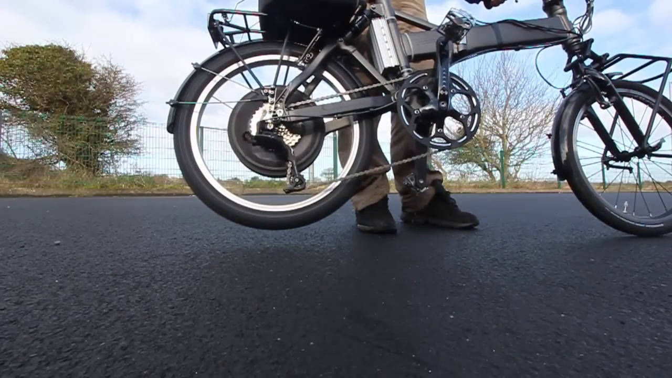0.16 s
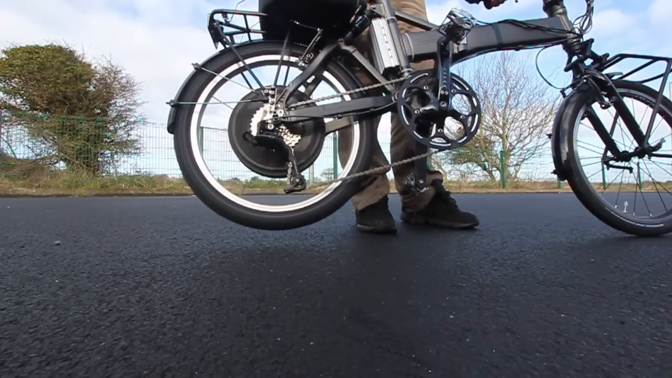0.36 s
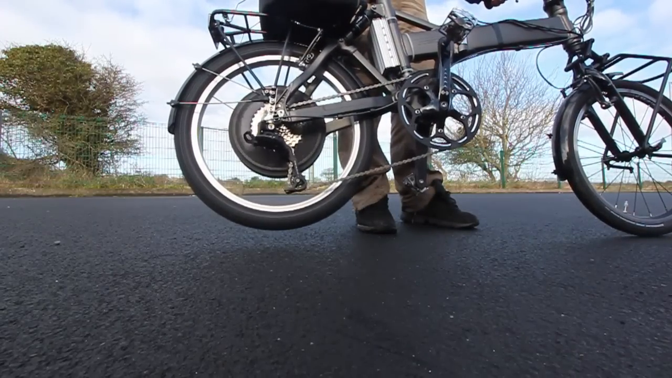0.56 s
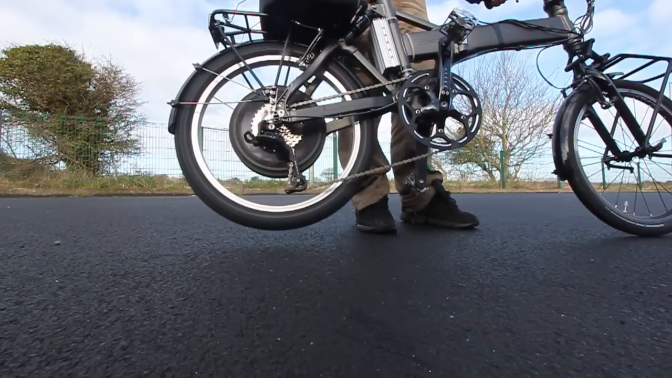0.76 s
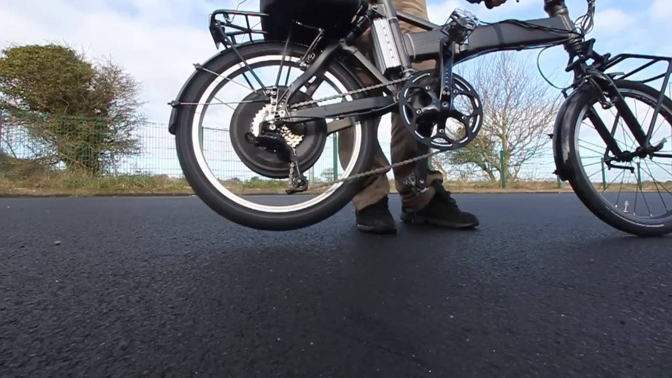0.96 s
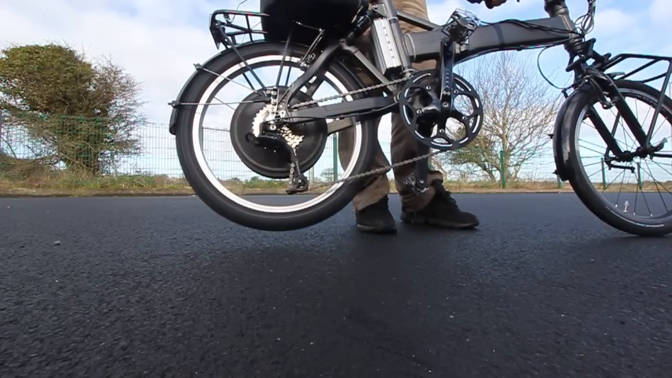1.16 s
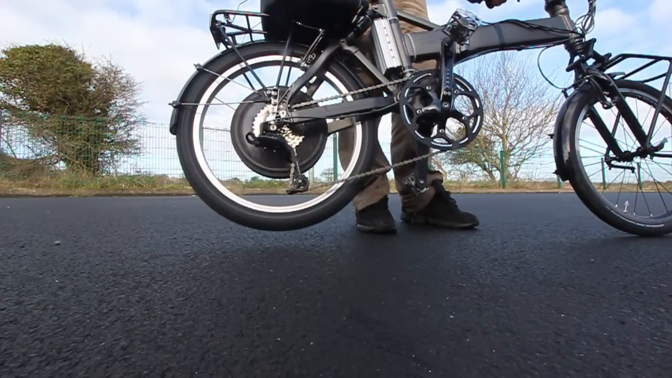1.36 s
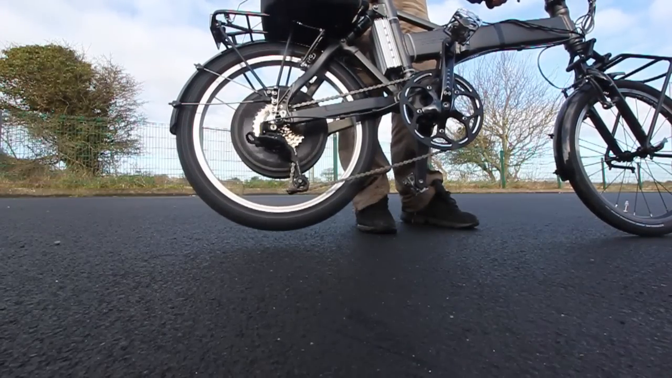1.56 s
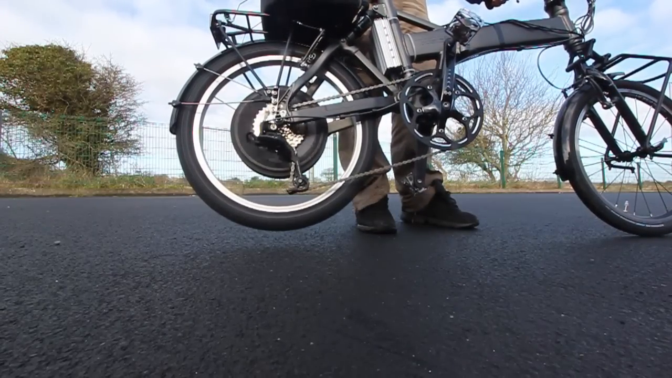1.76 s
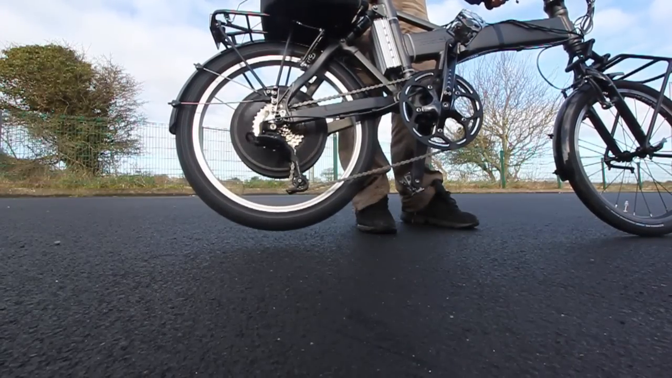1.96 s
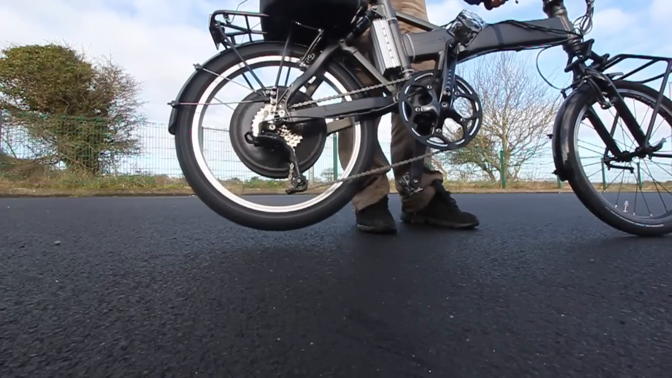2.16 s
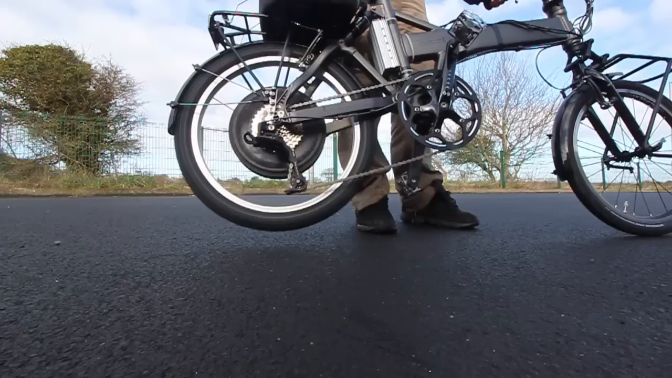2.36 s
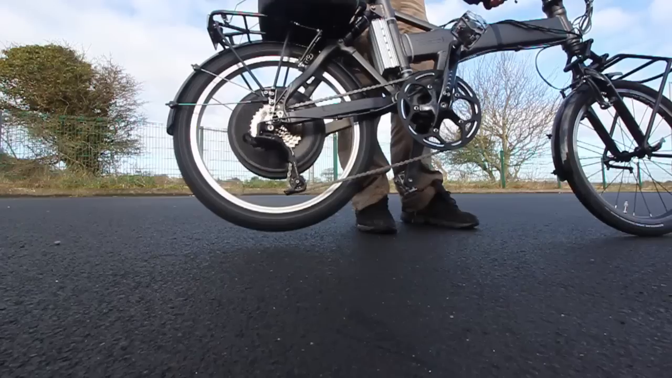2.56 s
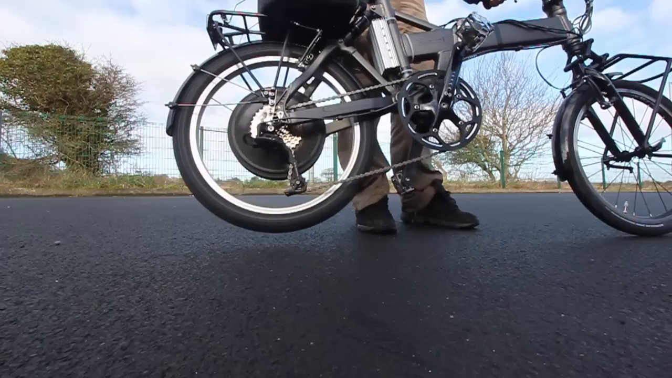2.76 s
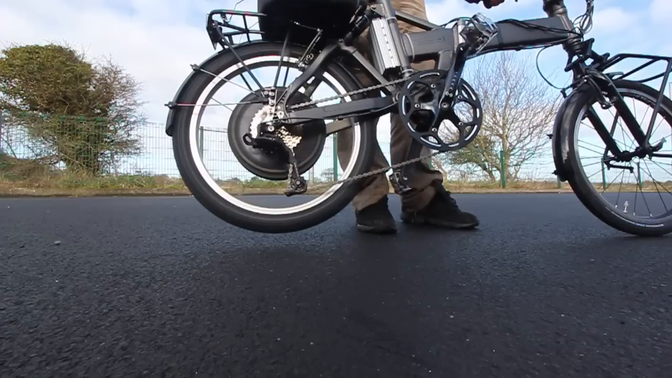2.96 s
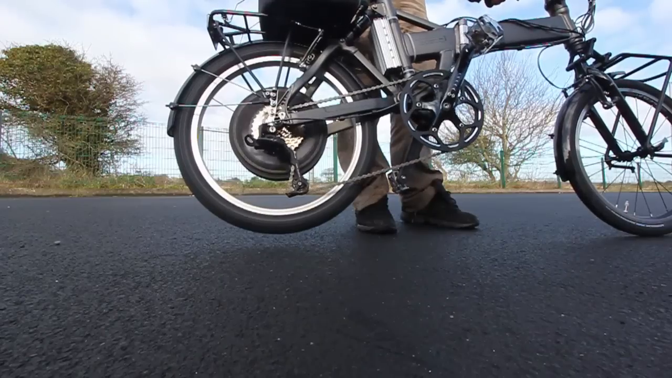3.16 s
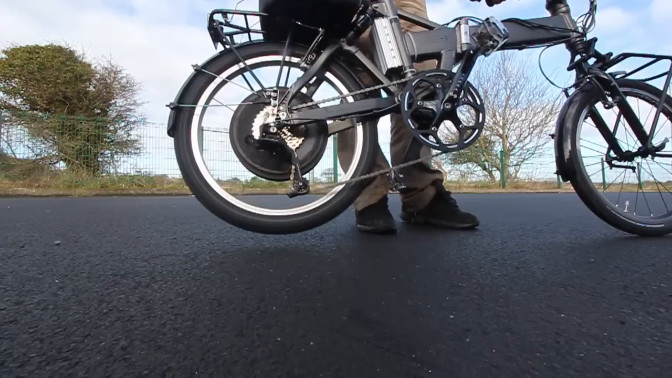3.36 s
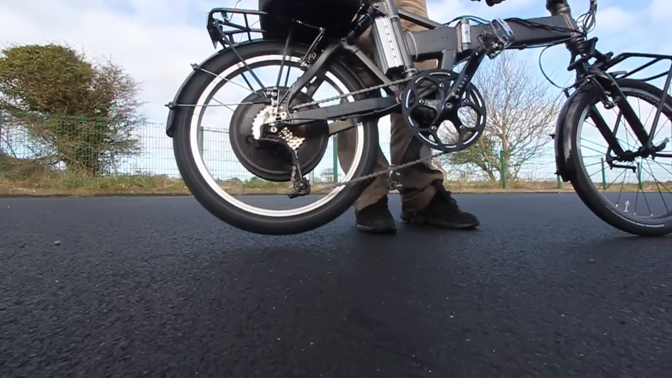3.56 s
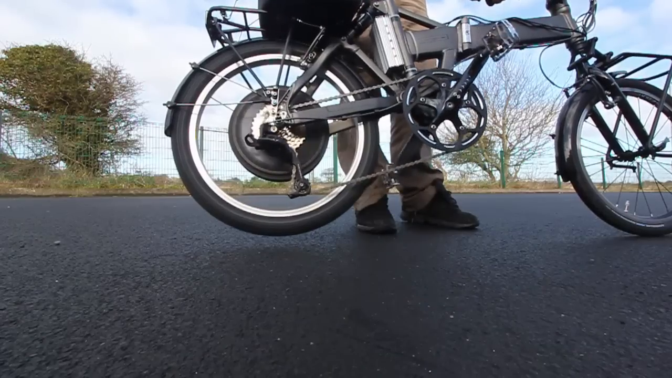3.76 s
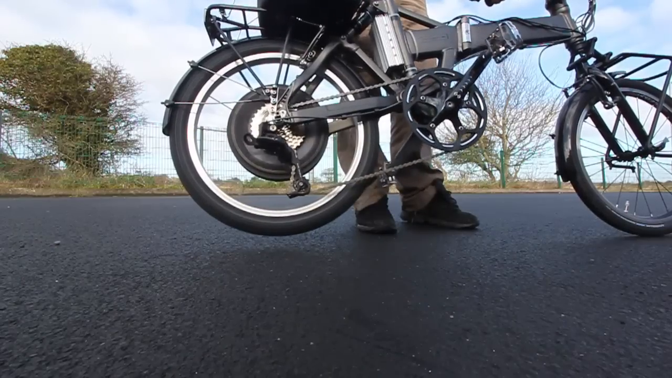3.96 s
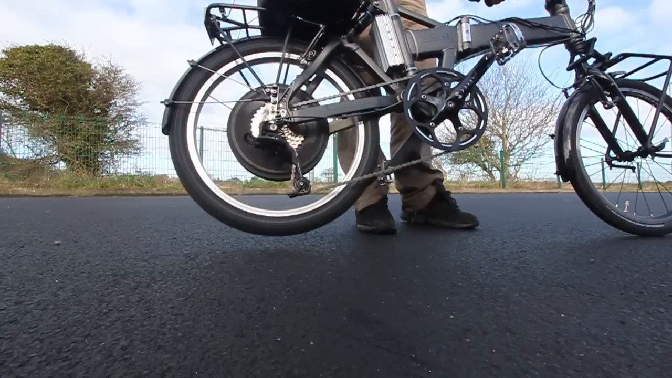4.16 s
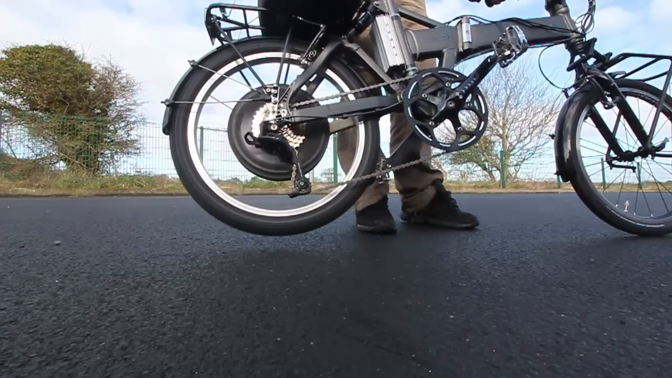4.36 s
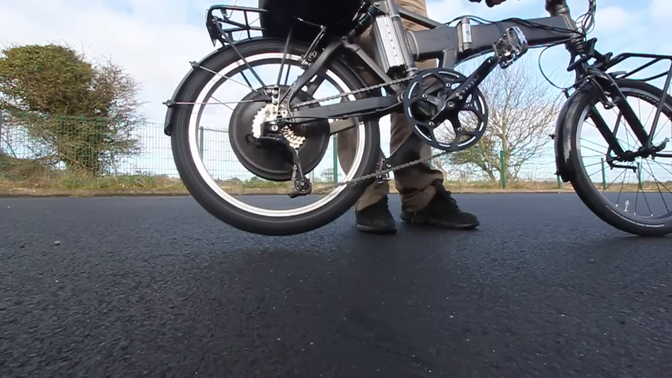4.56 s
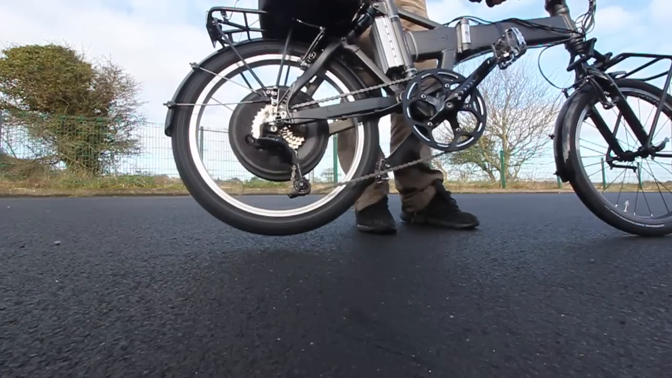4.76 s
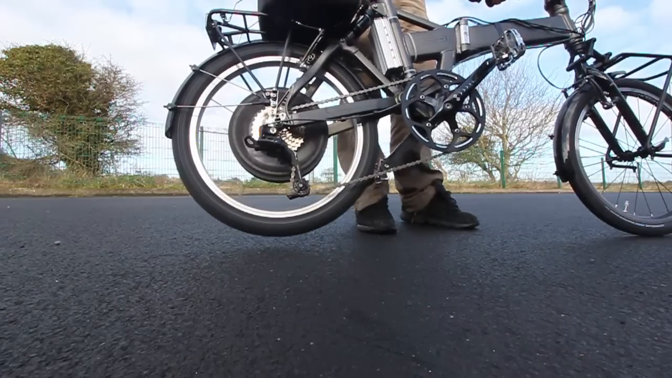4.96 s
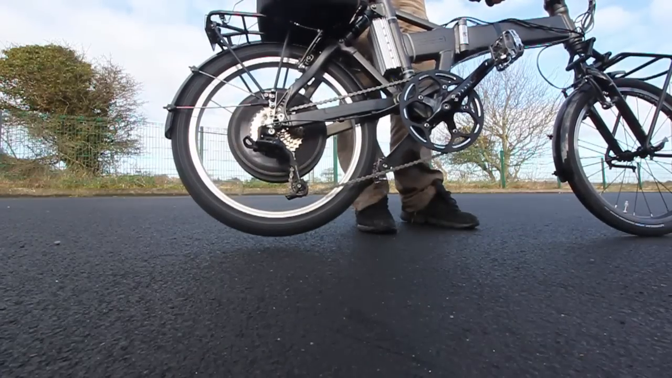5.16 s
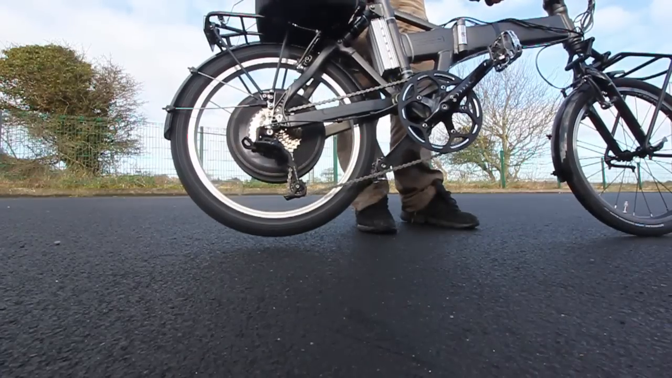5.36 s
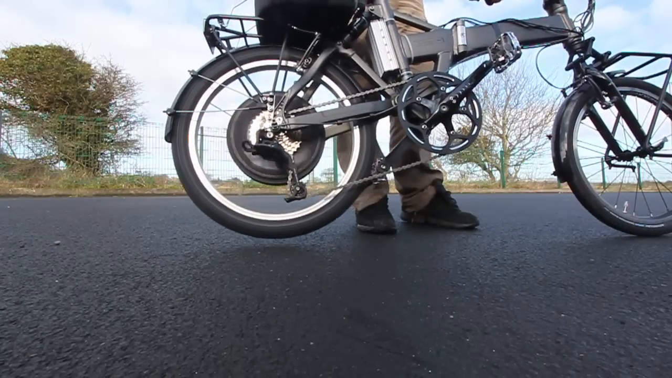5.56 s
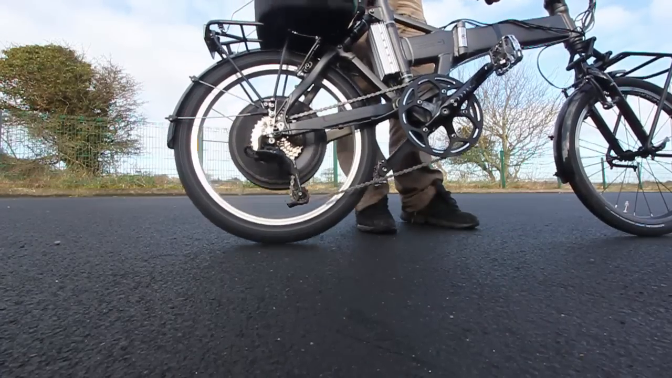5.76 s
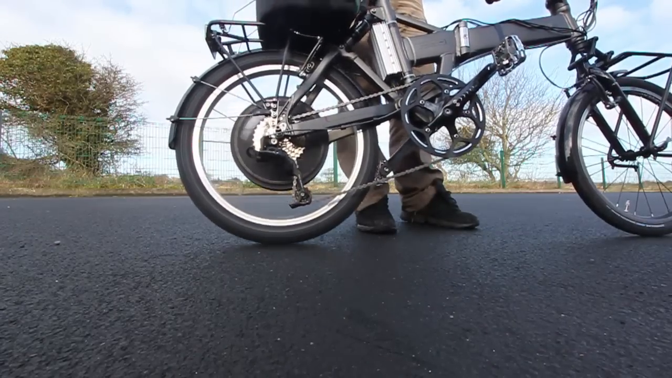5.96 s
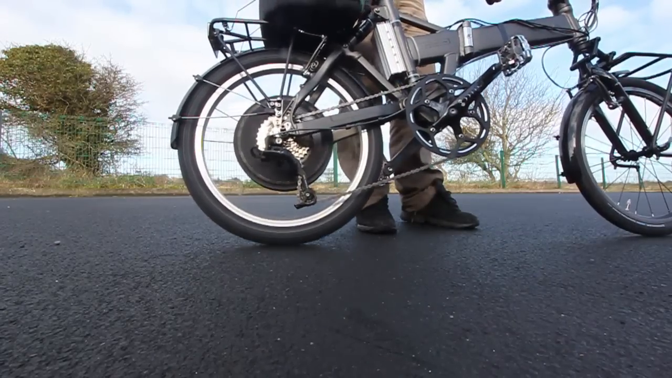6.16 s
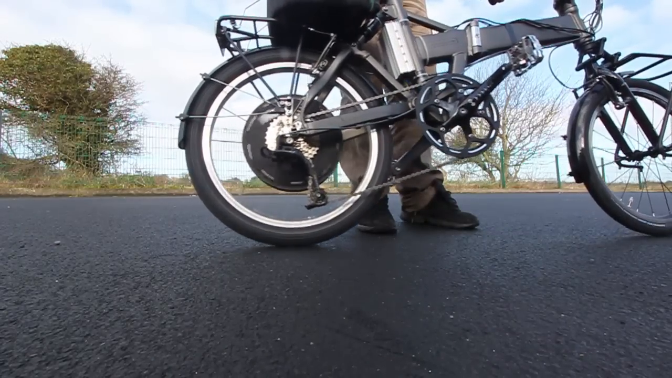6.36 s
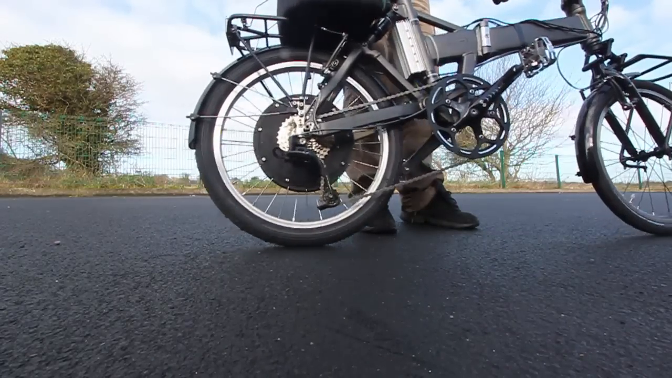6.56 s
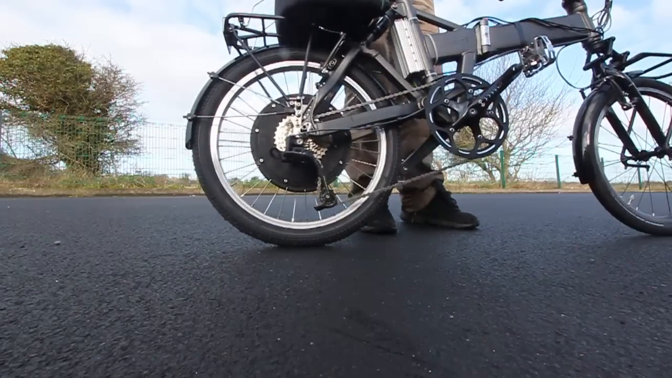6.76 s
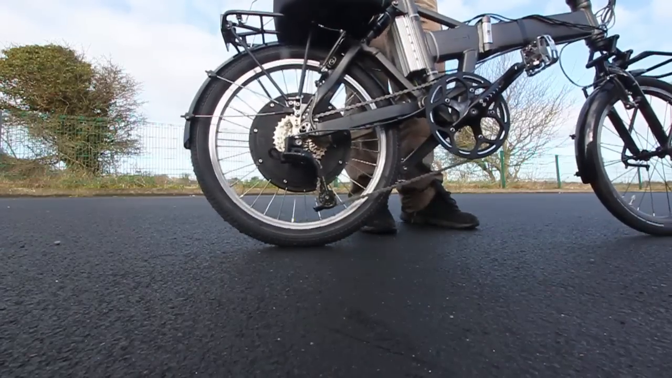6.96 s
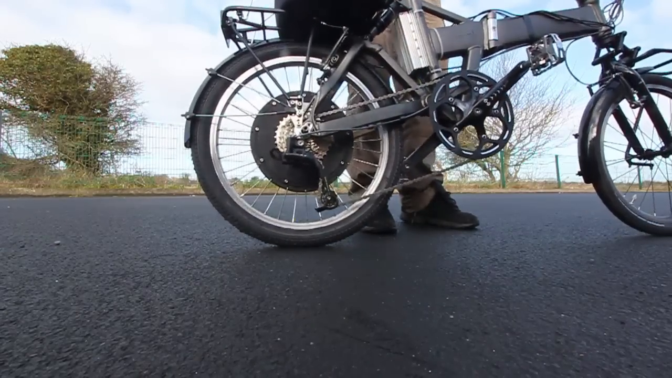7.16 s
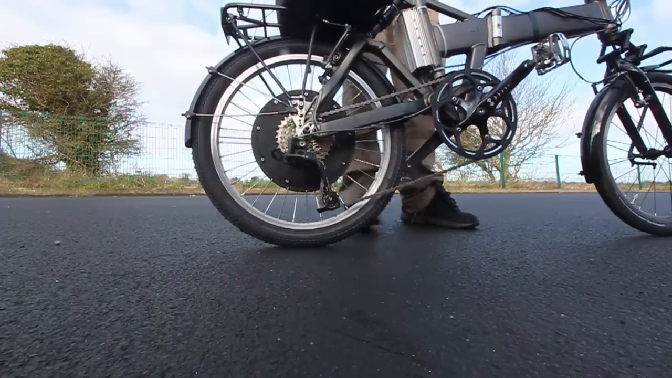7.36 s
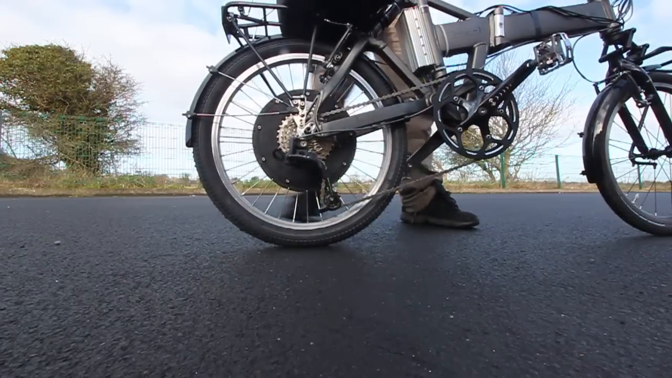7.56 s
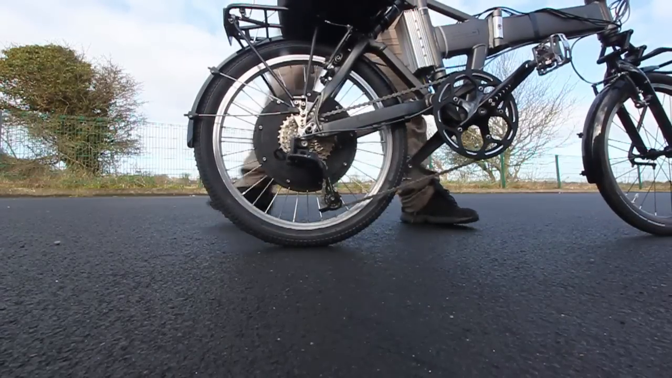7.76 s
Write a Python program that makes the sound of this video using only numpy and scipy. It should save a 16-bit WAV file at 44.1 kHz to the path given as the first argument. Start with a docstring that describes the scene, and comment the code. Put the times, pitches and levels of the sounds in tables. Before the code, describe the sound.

A lifted bicycle hub-motor wheel whirs fast with rattle, ratchet buzz and whistle, clicks off, coasts down, then its tyre skids to a halt outdoors.

```python
"""First the hub motor of a folding e-bike spins the lifted rear wheel flat out: the freewheel's ratchet buzzes,
hub and mudguard rattle once a turn as resonators struck by small knocks, and the drive whistles in steady tones.
A click cuts the power and the wheel coasts; a hollow whirr swells as it is lowered, then the tyre skids to a halt
with a falling zip, tread and texture being played at the speed of the wheel. Small ticks, faint squeaks and a
soft rustle follow. Filtered noise makes the light wind and the far traffic throughout."""
import sys
import numpy as np
from scipy import signal
from scipy.fft import rfft, irfft, next_fast_len
from scipy.io import wavfile
from scipy.ndimage import uniform_filter1d, map_coordinates

SR = 44100
rng = np.random.default_rng(int(sys.argv[2]) if len(sys.argv) > 2 else 0)


def transcribe(u):
    """Save the signal u as a 16-bit wav file named by the first command-line argument.

    u: samples, shape (n,) or (channels, n), limited to [-1, 1]; the rate is SR.
    q: integer samples, one column per channel.
    """
    v = np.clip(np.atleast_2d(u).T, -1, 1)
    q = np.round(v * 32767).astype(np.int16)
    wavfile.write(sys.argv[1], SR, q)


N = 344729
TIME = np.arange(N) / SR
FFT_SIZE = 2 * next_fast_len(N // 2 + SR // 4, True)
BINS = np.arange(FFT_SIZE // 2 + 1) * SR / FFT_SIZE + 1e-3  # Hz, kept above zero for the logarithm
POWER_OFF_S, TOUCH_S, SWELL_S, SHIFT_S = 3.918, 5.803, 6.15, 6.63
TEETH, MAGNETS, TREAD_BLOCKS = 30, 46, 78  # per turn of the wheel


def undb(db):
    """Level to amplitude: 20 dB is a factor of ten."""
    return 10 ** (np.asarray(db) / 20)


def unit(x):
    """Normalisation to an rms of 1."""
    return x / np.sqrt(np.mean(x ** 2))


def curves(table):
    """Linear interpolation: the columns of a table, joined by straight lines in time."""
    s, *columns = np.transpose(table)
    return [np.interp(TIME, s, column) for column in columns]


def after(s, rise):
    """Linear gate: opens from 0 to 1 over `rise` seconds, starting at time s."""
    return np.clip((TIME - s) / rise, 0, 1)


def since(s):
    """Elapsed time: seconds since time s, 0 before it."""
    return np.maximum(TIME - s, 0)


def noise():
    """White noise: equal power at all frequencies."""
    return rng.standard_normal(N)


def walk(rate):
    """Slow random modulation: levels held 1 / rate s and smoothed twice, spread near 1."""
    hold = max(int(SR / rate), 1)
    steps = np.repeat(rng.standard_normal(N // hold + 1), hold)
    return 1.01 * uniform_filter1d(uniform_filter1d(steps, hold), hold)[:N]


def colour(x, points, step_hz=1):
    """Zero-phase filtering: a spectrum through (frequency [step_hz], level [dB]) points; rms 1."""
    f, db = np.transpose(points)
    gain = undb(np.interp(np.log(BINS / step_hz), np.log(f), db))
    return unit(irfft(rfft(x, FFT_SIZE) * gain)[:N])


def ring(x, modes):
    """Modal resonance: the powers of the modes add, and a cepstrum makes the filter causal; rms 1."""
    power = sum(undb(2 * db) / (1 + ((BINS ** 2 - hz ** 2) / (BINS * width)) ** 2) for hz, width, db in modes)
    cepstrum = irfft(np.log(power))[:FFT_SIZE // 2]
    return unit(irfft(rfft(x, FFT_SIZE) * np.exp(rfft(cepstrum, FFT_SIZE)))[:N])


def tones(lines, waver_db):
    """Pure tones: sines of fixed frequency and given rms that waver a little in level."""
    total = 0
    for hz, db in lines:
        sine = np.sin(2 * np.pi * (hz * TIME + rng.random()))
        total = total + np.sqrt(2) * undb(db + waver_db * walk(9)) * sine
    return total


# spectrum of the far traffic: (frequency [Hz], relative level [dB])
OUTDOORS = [(15, -59), (25, -30.5), (142, -14), (237, -17.5), (301, -8), (326, -12.5), (637, -16.5),
            (691, -16), (1000, -14), (2630, -32.5), (15000, -49.5)]


def far_traffic(start_db=-58, swell_db_per_s=3):
    """Broadband ambience: dull noise whose level rises steadily from SWELL_S on."""
    level = undb(start_db + swell_db_per_s * since(SWELL_S) + .6 * walk(11))
    return level * colour(noise(), OUTDOORS)


# low tone and its octave: (frequency [Hz], level before the octave's offset [dB rms])
TRAFFIC_HUM = [(150.7, -68), (301.5, -64)]


def traffic_hum(rise_db=7):
    """Harmonic pair: a faint low tone, with an octave that strengthens from SWELL_S on."""
    low, octave = (tones([line], waver_db=1.0) for line in TRAFFIC_HUM)
    return low + undb(-rise_db * (1.5 - after(SWELL_S, 0.9))) * octave


# puffs of wind: (time [s], level before the puff and eddy offsets [dB])
PUFFS = [(0.289, -44), (0.559, -36.5), (2.369, -40.5), (3.169, -38.5), (4.959, -31), (5.099, -31),
         (5.239, -39), (6.999, -50)]


def wind(width_s=0.016, puff_db=-7, eddy_s=0.066, eddy_db=-19):
    """Turbulent pressure: brief low puffs on the microphone, each trailed by a deeper eddy."""
    puff = sum(undb(db + puff_db) / (1 + ((TIME - s) / width_s) ** 4) for s, db in PUFFS)
    eddy = sum(undb(db + eddy_db) * np.exp(-((TIME - s) / eddy_s - .5) ** 2) for s, db in PUFFS)
    rumble = colour(noise(), [(20, -20.0), (55, -2.5), (120, 1.0), (220, -5.0), (450, -28.5), (2000, -72.5)])
    deep = colour(noise(), [(20, -19.0), (60, 1), (130, -9), (1000, -71.5)])
    return puff * rumble + eddy * deep


def hedges(x, t60_s=0.36, wet_db=-30):
    """Diffuse reflection: hedges and fence scatter a faint echo with exponential decay."""
    decay = undb(-60 * TIME / t60_s) * after(0.025, 0.016)
    tail = colour(noise(), [(300, -5.5), (4000, 1.5), (8000, -7.0), (15000, -18.0)]) * decay
    return undb(wet_db) * signal.fftconvolve(x, tail / np.sqrt(np.sum(tail ** 2)))[:N]


# resonances of the rustle: (frequency [Hz], width [Hz], relative level [dB])
RUSTLE = [(2300, 1200, -4), (3600, 580, 2.5), (4700, 1300, -5), (9000, 900, -13), (13000, 3000, -14)]


def rustle(start_db=-76.5, growth_db_per_s=12.5, scrape_s=7.81, scrape_width_s=0.12, scrape_db=6.5):
    """Friction noise: shifting the bike rustles, grows steadily and ends in a louder scrape."""
    scrape = scrape_db * np.exp(-((TIME - scrape_s) / scrape_width_s) ** 2)
    level = undb(start_db + growth_db_per_s * since(SHIFT_S) + scrape + 1.5 * walk(60))
    return level * after(SHIFT_S, 0.3) * ring(noise(), RUSTLE)


# squeaks as the bike is shifted: (time [s], half length [s], frequency [Hz], mean peak level [dB])
SQUEAKS = [(6.98, .1, 5000, -76), (7.28, .11, 3870, -71), (7.65, .12, 3550, -69)]


def squeaks(waver_db=3, flutter=.35):
    """Stick-slip tones: thin squeaks of the loaded frame, unsteady in level and phase (flutter in cycles)."""
    total = 0
    for s, half, hz, db in SQUEAKS:
        swell = undb(db + waver_db * walk(50)) * np.exp(-((TIME - s) / half) ** 2)
        total = total + swell * np.sin(2 * np.pi * (hz * TIME + flutter * walk(60)))
    return total


# clicks of drive train and frame: (time [s], peak level [dB], treble balance [dB])
CLICKS = [(3.917, -7.5, 7), (6.8517, -39, 2), (6.855, -36.5, 0), (6.864, -41, 2), (7.3224, -45, 0),
          (7.334, -36, -4), (7.7797, -37, 11), (7.79, -39, 5), (7.7984, -39, 3)]
# resonances of the frame: (frequency [Hz], width [Hz], relative level [dB])
FRAME = [(1080, 180, 4), (1900, 1400, 4), (2490, 250, 3), (3720, 120, 5), (5000, 540, 0), (8000, 2300, -7),
         (12000, 2800, -12)]


def clicks(contact_s=0.00016, decay_s=0.0021, tail_s=0.0099, tail_db=-20):
    """Impact: short cracks ring the frame with a two-stage decay, each with its own brightness."""
    body = colour(ring(noise(), FRAME), [(150, -28), (1000, -1), (4000, 3.5)])
    bright = colour(noise(), [(200, -50), (2000, -25), (7000, 1), (12500, 9), (16000, -9.0)])
    out = np.zeros(N)
    for s, db, treble_db in CLICKS:
        span = slice(int(s * SR), int(s * SR) + SR // 10)
        age = TIME[span] - TIME[span][0]
        decay = np.exp(-age / decay_s) + undb(tail_db) * np.exp(-age / tail_s)
        contact = 1 - np.exp(-age / contact_s)  # the parts take a moment to meet
        crack = (body[span] + undb(treble_db - 8.5) * bright[span]) * decay * contact
        out[span] += undb(db) * crack / np.abs(crack).max()
    return out


def lowering(whirr_db=-36.5, swell_db_per_s=13):
    """Hollow resonance: a whirr swells as the tyre nears the ground."""
    level = undb(whirr_db - swell_db_per_s * np.abs(TOUCH_S - TIME))
    return level * ring(noise(), [(1130, 61, 1), (1430, 150, -7.5), (1700, 250, -5)])


def cogging(turns, powered, hum_db=-50.5, coast_db=-10, waver_db=3, flutter=0.33):
    """Magnetic cogging: magnets passing the stator hum unevenly, louder under power (flutter in cycles)."""
    level = undb(hum_db + coast_db * (1 - powered) + waver_db * walk(30))
    return level * np.sin(2 * np.pi * (MAGNETS * turns + flutter * walk(40)))


# switching tones of the motor drive: (frequency [Hz], level [dB rms])
DRIVE = [(1055, -55), (3783, -50), (4398, -52), (5340, -55), (5911, -55), (6250, -58), (6934, -59),
         (7171, -48), (7564, -47), (8333, -54), (8430, -45), (9841, -53.5)]
# hissing resonances of the motor: (frequency [Hz], width [Hz], relative level [dB])
STATOR = [(4100, 210, -11), (5500, 480, -9), (6520, 91, -3.5), (7250, 180, 3), (7440, 310, -8.5),
          (9730, 370, 3.5)]


def drive(hiss_db=-38):
    """Magnetic excitation: the switched motor current whistles and hisses in the stator."""
    hiss = colour(ring(noise(), STATOR), [(1000, -15), (4000, -0.5), (10000, -5.0), (14000, -11)])
    return tones(DRIVE, waver_db=3.5) + undb(hiss_db) * hiss


# level of the tyre scrubbing on the asphalt: (time [s], relative level [dB])
SKID = [(5.81, -16), (5.876, -23.5), (6.044, -20.5), (6.096, -28.5), (6.114, -24.5), (6.232, -22.5),
        (6.332, -24.5), (6.432, -37), (6.45, -41)]
# whine of the tread, one row per multiple of the block rate from the first: (relative level [dB])
TREAD = [-11.5, -2, -12.5, 0, -6, -3.5, -9, 0.5, -8, -4.5, -8.5, -10.5, -9, -3.5, 0]
# how tyre and rim radiate the whine: (frequency [Hz], relative level [dB])
TYRE = [(200, -18.5), (700, -13.5), (1800, -14.5), (2400, 1), (3100, -3), (4500, -5), (9000, -3),
        (14000, -12.5)]
# fine texture of the rubber: (frequency [multiples of the block rate], relative level [dB])
TEXTURE = [(1, -43), (4, -15), (11.8, -15), (13.6, -0.5), (15.2, 0.5), (17.2, -7.5), (25, -21),
           (30.5, -7.5), (36, -20.5)]


def skid(speed, turns, whine_db=-7, scuff_db=-2.0, grit_db=-34, grit_fade_speed=2.4,
         patchy_db=5.5, slap=0.47, slip=0.026, bite_s=0.052, first_db=-6):
    """Periodic contact: blocks slap and texture scuffs the asphalt, so both pitches fall with the speed."""
    level_db, = curves(SKID)
    blocks = turns * TREAD_BLOCKS + slip * walk(260)
    whine = 0
    for k, db in enumerate(TREAD, 1):
        harmonic = np.sin(2 * np.pi * (k * blocks + rng.random()))
        whine = whine + undb(db + patchy_db * walk(55)) * harmonic
    whine = whine * undb(2.5 * walk(220))  # the rubber grips and lets go
    # the texture lies on the tyre and is played at the speed at which it passes the ground
    size = 256  # texture samples per block
    texture = colour(noise(), TEXTURE, step_hz=SR / size)
    scuff = map_coordinates(texture, [blocks * size % (N - 1)], order=1)
    depth = slap * np.clip(speed / np.interp(TOUCH_S, TIME, speed), 0, 1) ** .5  # slow blocks settle softly
    slaps = (1 + depth * np.cos(2 * np.pi * blocks)) * undb(2 * depth * walk(120))
    scuff = colour(scuff * slaps, [(60, -32.5), (400, -12.0), (1500, 0), (9000, 3.5), (15000, 2.5)])
    grit = colour(noise(), [(60, -35.5), (400, -20.0), (1500, -3.5), (6000, 5.0), (11000, -2.5), (15500, -9)])
    grit_level = undb(grit_db) * np.sqrt(np.clip(speed / grit_fade_speed, 0, 1))
    contact = after(TOUCH_S, 0.0044) * np.clip(speed / .4, 0, 1)
    bite = undb(first_db * (1 - after(TOUCH_S, bite_s)))  # the whine gains strength as the tread bites
    rubber = undb(whine_db) * bite * colour(whine, TYRE) + undb(scuff_db) * scuff
    return contact * (undb(level_db) * rubber + grit_level * grit * slaps)


def beat(phase, sharp):
    """Periodic modulation: a smooth bump that peaks at 1 at every whole number of the phase."""
    return np.exp(sharp * (np.cos(2 * np.pi * phase) - 1))


# spells in which a high spot of the wheel rubs once a turn: (start [s], end [s], place on the turn [0-1],
# extra level on the hub shell [dB], extra level on the mudguard [dB]), extras before the mean is removed
RUBS = [(0, 2.3, .15, 1, 6), (0.5, 3.2, .63, 3.5, 3.5), (3.15, 3.92, .88, 3, 7.5), (3.92, 5.65, .37, 5, 7),
        (3.95, 4.95, .56, 6, 0), (4.75, 5.7, .8, 3, 7)]


def rubbing(turns, sharpness=2.6, fade_s=.15):
    """Once-per-turn modulation: dB on shell and guard as high spots pass, less the half-second mean."""
    shell = guard = 0
    for start, end, place, shell_db, guard_db in RUBS:
        spell = after(start - fade_s / 2, fade_s) - after(end - fade_s / 2, fade_s)
        bump = spell * beat(turns - place, sharpness)
        shell = shell + shell_db * bump
        guard = guard + guard_db * bump
    return [db - uniform_filter1d(db, SR // 2) for db in (shell, guard)]


def knocks(hits_per_s=3200, spread_db=2.5):
    """Random impulse train: dense little contacts of uneven strength and either sign."""
    hits = rng.random(N) < hits_per_s / SR
    return hits * np.sign(noise()) * undb(spread_db * noise())


# resonances of the hub shell: (frequency [Hz], width [Hz], relative level [dB])
SHELL = [(2603, 160, -12), (2880, 88, -7.5), (3015, 58, 0.5), (3150, 70, -18), (3250, 49, -3.5),
         (3740, 300, -21.5)]
# resonances of the mudguard: (frequency [Hz], width [Hz], relative level [dB])
MUDGUARD = [(1028, 190, -17), (1466, 30, -11.5), (1937, 86, 0), (2094, 230, -4), (2370, 250, -8.5)]
# dull body of the rattle between the resonances: (frequency [Hz], relative level [dB])
CLATTER = [(60, -25), (250, -13), (600, -6.5), (1100, -1), (2200, 1), (3400, 1), (4600, -8.5), (9000, -13)]


def rattle(turns, uneven_db=0.77, shell_db=-0.66, guard_db=-5.5, body_db=-9.0):
    """Impact excitation: knocks ring shell and mudguard, harder whenever a high spot passes."""
    on_shell, on_guard = rubbing(turns)
    uneven = uneven_db * walk(90)
    force = undb(on_shell + uneven)
    shell = undb(shell_db) * ring(knocks() * force, SHELL)
    guard = undb(guard_db) * ring(knocks() * undb(on_guard + uneven), MUDGUARD)
    ringing = colour(shell + guard, [(200, -6), (900, -0.5), (3400, 0.5), (4600, -6.0), (8000, -17.5)])
    return ringing + undb(body_db) * colour(noise() * np.sqrt(force), CLATTER)


# resonances of the freewheel body: (frequency [Hz], width [Hz], relative level [dB])
FREEWHEEL = [(5180, 270, -8.5), (6220, 73, -10.5), (6500, 140, -7.5), (7894, 120, -2), (8910, 180, -4),
             (9920, 290, -4), (10690, 180, -4), (11590, 500, -4), (12200, 86, 0), (13200, 140, 1.5),
             (13900, 410, -7.5), (15770, 230, 2)]
# resonances of the pawls: (frequency [Hz], width [Hz], relative level [dB])
PAWLS = [(13360, 350, -3), (14040, 310, -4.5)]


def freewheel(turns, body_db, pawl_db, snap=0.26, chatter=0.54, scatter_db=1, wear_db=-1.6, fizz_db=-6):
    """Ratchet excitation: pawls snap off every tooth (decay `snap` in teeth) and chatter until the next."""
    tooth, phase = np.divmod(turns * TEETH, 1)
    tooth = tooth.astype(int)
    # each tooth is worn in its own way, and no two snaps are equally strong
    wear = wear_db * rng.standard_normal(TEETH)[tooth % TEETH]
    size = undb(wear + scatter_db * noise()[tooth])
    snaps = size * (chatter + np.exp(-phase / snap))
    steel = ring(snaps * noise(), FREEWHEEL) + undb(fizz_db) * unit(snaps * noise())
    body = colour(steel, [(1500, -13.5), (4500, -8), (7300, -5), (7900, -0.5), (12000, -3.5), (15000, -1.5)])
    return undb(body_db) * body + undb(pawl_db) * ring(snaps * noise(), PAWLS)


# rear wheel, flat out, coasting, then braked by the ground: (time [s], speed [turns/s])
WHEEL = [(0, 13.6), (1.2, 13.7), (3.2, 13.57), (3.92, 13.57), (4.2, 12.72), (4.88, 11.0), (5.8, 8.75),
         (5.85, 8.12), (6, 6.98), (6.1, 6.03), (6.25, 4.39), (6.3, 3.65), (6.46, 0)]
# strength of the rattle while the wheel is in the air: (time [s], relative level [dB])
RATTLE = [(0, -21.5), (0.8, -22.5), (2.3, -25), (2.95, -24), (3.4, -22.5), (4.05, -25.5), (5.75, -25)]
# high ring of the pawls, before it fades with braking: (time [s], level [dB])
PAWL_RING = [(0, -35.5), (0.6, -31.5), (1.8, -31), (2.3, -36), (2.95, -35), (3.3, -31.5), (4.05, -40),
             (5, -45), (5.4, -35), (5.75, -39)]


def scene(rattle_db=-0.56, freewheel_db=-29.0, coast_db=-1.0):
    """Common rotation: the wheel's angle drives rattle, ratchet and tread; ground contact damps the rattle."""
    speed, = curves(WHEEL)
    rattle_curve_db, = curves(RATTLE)
    pawl_db, = curves(PAWL_RING)
    turns = np.cumsum(speed) / SR
    powered = 1 - after(POWER_OFF_S, .01)
    airborne = 1 - after(TOUCH_S, 0.071)
    slowing = np.clip(speed / np.interp(TOUCH_S, TIME, speed), 0, 1)  # the ratchet fades as the wheel is braked
    background = far_traffic() + traffic_hum() + wind() + rustle()
    hub = undb(rattle_curve_db + rattle_db) * rattle(turns) + cogging(turns, powered) + lowering()
    ratchet = slowing ** 2 * freewheel(turns, freewheel_db + coast_db * (1 - powered), pawl_db)
    bike = squeaks() + clicks() + powered * drive() + skid(speed, turns) + airborne * hub + ratchet
    return (background + hedges(bike) + bike)[None]


def record(dry, top_hz=15650):
    """Band limiting: a steep elliptic low-pass removes the highest treble."""
    return signal.sosfilt(signal.ellip(12, .1, 90, top_hz, fs=SR, output="sos"), dry)


dry = scene()
out = record(dry)
transcribe(out)
```